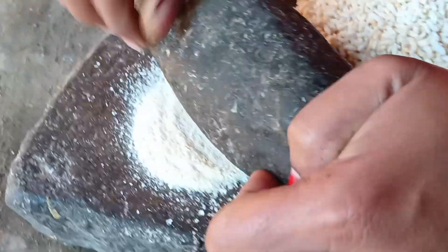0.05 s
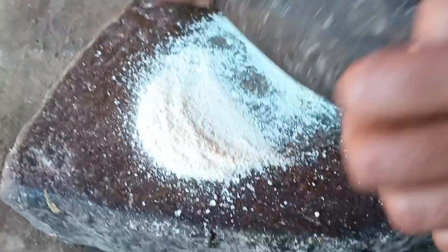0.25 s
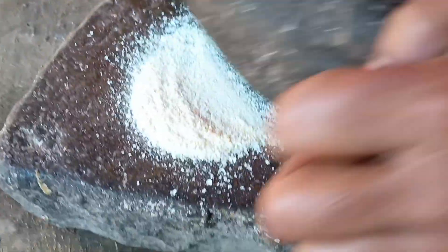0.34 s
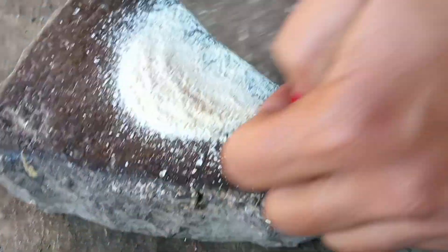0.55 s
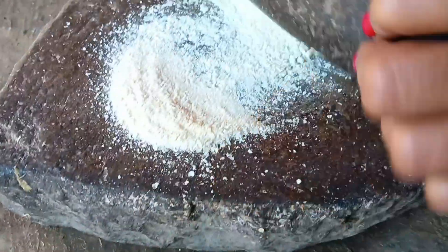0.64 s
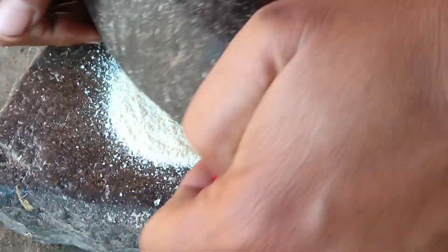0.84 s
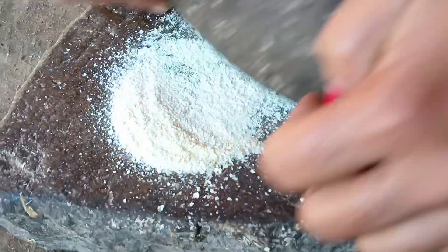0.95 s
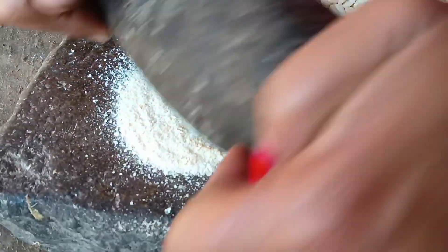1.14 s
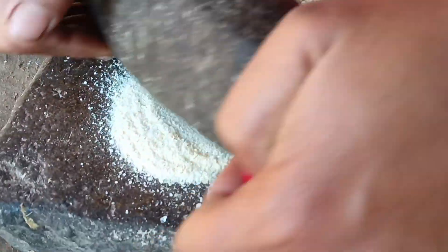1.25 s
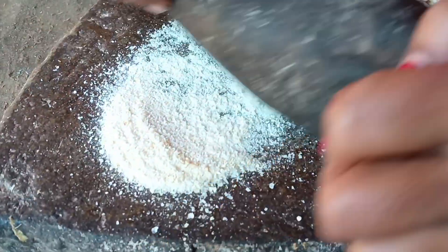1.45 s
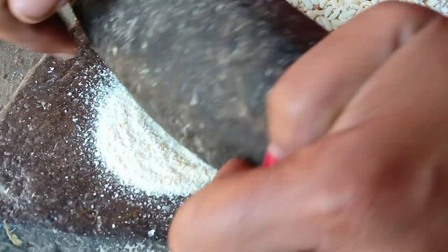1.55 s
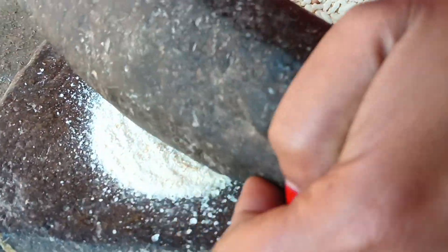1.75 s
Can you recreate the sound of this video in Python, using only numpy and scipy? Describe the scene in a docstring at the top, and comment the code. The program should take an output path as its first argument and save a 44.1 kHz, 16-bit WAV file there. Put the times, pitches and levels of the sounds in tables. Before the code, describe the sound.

A stone muller grinds puffed rice on a stone slab in quick back-and-forth strokes, rasping and rumbling with crisp gritty crunches; glassy bangle clinks punctuate the turns. Close microphone outdoors, mono, faint bird peeps behind.

```python
"""Outdoors, close by: a stone muller is worked back and forth over a stone slab. Each stroke rasps and rumbles:
random grit impacts through stone resonances. Forward strokes crush puffed rice, gritty cracks over noise; flour
hisses on the way back. Bright clinks, probably glass bangles as the hand turns, are noise cracks with ringing modes.
The eased muller hums and squeaks: narrow noise bands. Birds peep faintly, as gliding sines over quiet noise."""
import sys
import numpy as np
from scipy import signal
from scipy.fft import rfft, irfft, next_fast_len
from scipy.io import wavfile
from scipy.ndimage import map_coordinates

SR = 44100
rng = np.random.default_rng(int(sys.argv[2]) if len(sys.argv) > 2 else 0)


def wrap_up_sound(samples):
    """Save the sound to the file named by the first command line argument, as 16-bit audio."""
    columns = np.atleast_2d(samples).T
    # keep every value between -1 and 1, then stretch to whole-number steps
    tamed = np.clip(columns, -1, 1)
    steps = np.round(tamed * 32767).astype(np.int16)
    wavfile.write(sys.argv[1], SR, steps)


N = 79380


def amp(db):
    """Decibels to gain."""
    return 10 ** (np.asarray(db) / 20)


def unit(x):
    """Scale to rms 1."""
    return x / np.sqrt(np.mean(x ** 2) + 1e-20)


def along(points, hz):
    """Interpolate (f/Hz, value) points on a log-frequency axis."""
    f, v = np.transpose(points)
    return np.interp(np.log(hz + 1), np.log(f + 1), v)


def filtered(x, response):
    """Filter x by a response given as a function of f/Hz."""
    m = next_fast_len(len(x) + 8192)
    spectrum = rfft(x, m) * response(np.fft.rfftfreq(m, 1 / SR))
    return irfft(spectrum, m)[:len(x)]


def tilted(hz, tilt_db):
    """Gain of a tilt in dB per octave: 0 dB at 9 kHz, constant below 2.5 kHz."""
    return amp(tilt_db * np.log2(np.maximum(hz, 2500) / 9000))


def body(modes, f):
    """Sum of bandpass resonances (f/Hz, width/Hz, level/dB), alternating in sign."""
    total = 0
    for k, (centre, width, db) in enumerate(modes):
        resonance = 1j * f * width / (centre * centre - f * f + 1j * f * width)
        total = total + (-1) ** k * amp(db) * resonance
    return total


def grains(per_s, scatter_db):
    """Random tiny impacts of uneven size and either sign, rms 1."""
    size = amp(scatter_db * np.clip(rng.standard_normal(N), -2.5, 2.5))
    struck = rng.random(N) < per_s / SR
    return unit(struck * size * rng.choice([-1, 1], N))


def swell(peak, rise, fall):
    """Pressure of one stroke: builds to a peak and lets go."""
    drop_db, curvature = 26.5, 1.74  # drop at the end of rise or fall
    t = np.arange(N) / SR - peak
    return amp(-drop_db * np.abs(t / np.where(t < 0, rise, fall)) ** curvature)


def wobble(knots_per_s):
    """Smooth random curve through normal random knots."""
    return map_coordinates(rng.standard_normal(2000), [np.arange(N) * knots_per_s / SR])


def add(out, s, sound):
    """Mix a sound into out at time s."""
    part = out[round(s * SR):][:len(sound)]
    part += sound[:len(part)]


def air():
    """Quiet outdoor background: coloured noise with a slowly moving level."""
    # background level: t/s, level/dB
    level_points = [(0, -52.5), (.15, -51.5), (1.6, -48.5), (1.8, -50.5)]
    # background spectrum: f/Hz, gain/dB
    air_colour = [(25, -27), (90, 11), (250, 2), (700, -8), (2300, -5), (2750, -5.5), (3300, -7.5),
                  (5000, -8), (7000, -14.5), (11000, -17), (16000, -28)]
    level_db = np.interp(np.arange(N) / SR, *np.transpose(level_points))
    noise = filtered(rng.standard_normal(N), lambda f: amp(along(air_colour, f)))
    return amp(level_db) * unit(noise)


def birds():
    """Thin fluttering whistles that arch in pitch, smeared by a decaying noise tail for distance."""
    # peeps: t of top/s, top f/Hz, rise/s, fall/s, pitch drop one fall time from the top/Hz, level/dB
    peeps = [(.030, 5220, 0.031, .075, 2480, -52.5), (.51, 4850, 0.068, 0.073, 412, -56.5),
             (.895, 3560, 0.02, 0.11, 1200, -51), (1.148, 3430, 0.018, .07, 1300, -49),
             (1.235, 5220, 0.015, 0.024, 100, -57), (1.713, 5600, 0.036, 0.036, 688, -57),
             (1.75, 4400, .045, 0.026, 71, -60), (1.754, 5200, .012, .06, 700, -57.5)]
    flutter_db, flutter_knots_per_s = 2.5, 120
    echo_db, echo_t60_s = -3, 0.13
    out, t = np.zeros(N), np.arange(N) / SR
    for s, top_hz, rise, fall, drop_hz, db in peeps:
        hz = top_hz - drop_hz * np.minimum(((t - s) / fall) ** 2, 2)
        u = np.clip((t - s) / np.where(t < s, rise, fall), -1, 1)
        envelope = 1 - np.abs(u) ** 10
        out += amp(db) * np.sqrt(2) * envelope * np.sin(2 * np.pi * np.cumsum(hz) / SR)
    out *= amp(flutter_db * wobble(flutter_knots_per_s))
    tail = rng.standard_normal(SR // 2) * amp(-60 * t[:SR // 2] / echo_t60_s)
    echo = signal.fftconvolve(out, tail / np.linalg.norm(tail))[:N]
    return out + amp(echo_db) * echo


def contact(tilt_db, ring_db, count=2):
    """One touch of glass on glass: a crack with a slower tail, and modes of nearly equal bangles, drawn anew."""
    # bangle modes before detuning: f/Hz, level/dB, t60/s
    bangle_modes = [(2413, -14, 0.1), (3230, -5.5, .05), (6600, -26, 0.03), (6480, -24, .06),
                    (7950, -28, 0.072), (8840, -3, 0.078), (9100, -1.5, 0.065), (9500, -5.5, 0.1),
                    (9830, 0, 0.067), (11000, 1, .05), (12620, 1, 0.047), (12600, -3, 0.046),
                    (13750, -1, 0.11), (15900, -3, 0.078)]
    # crack spectrum before tilt: f/Hz, gain/dB
    crack_colour = [(300, -34), (1500, -13), (3200, -11.5), (4600, -13.5), (5900, -8.5), (6700, 5.5),
                    (7700, -0.5), (9200, 9), (10600, -16), (12500, -4), (15500, 0)]
    crack_t60_s, tail_t60_s, tail_db = .013, 0.085, -11
    base_ring_db = -12.5
    detune = .018  # scale of the random pitch spread, as a share of mode frequency
    t = np.arange(SR // 10) / SR
    noise = rng.standard_normal(len(t))
    crack = unit(filtered(noise, lambda f: amp(along(crack_colour, f)) * tilted(f, tilt_db)))
    crack *= amp(-60 * t / crack_t60_s) + amp(tail_db - 60 * t / tail_t60_s)

    hz, db, t60 = np.transpose(bangle_modes)[:, :, None]
    size, shift, phase = rng.uniform(-1.14, 1, (3, count, len(hz), 1))
    tones = size * np.sin(2 * np.pi * (hz * (1 + detune * shift) * t + phase))
    ring = amp(db - 60 * t / t60) * tilted(hz, tilt_db) * tones.sum(0)
    onset = 1 - np.exp(-t / .0001)
    return (crack + amp(base_ring_db + ring_db) * ring.sum(0)) * onset


def bangles(count=3):
    """Each clink is a quick rattle of a few weakening contacts."""
    # clinks: t/s, relative level/dB, rattle length/s, tilt/(dB/octave), relative ring level/dB
    clinks = [(0.0681, -23, 0.00038, 9.5, -7), (0.116, -31, 0.0026, -0.5, 5.5),
              (0.2356, -26, 0.00028, -7.5, -22), (0.262, -18, .004, 4, -18), (0.282, -22, 0.0047, 13, -8),
              (0.4, -44.5, .001, -8, 11), (0.4158, -22.5, .003, -1, 6), (0.4423, -28, .002, -4.5, 4),
              (.458, -17, .009, 2, 2), (0.6351, -6, .001, 3.5, -20), (0.7717, -23, .003, 5, -3),
              (0.7894, -27.5, .001, -1.5, 5), (0.7948, -19, .001, 8, -2), (.8015, -11.5, .008, 2, 3.5),
              (.991, -28, 0.00066, 8, -6), (1.0088, -9, 0.00049, -1, -2.5), (1.042, -14.5, .0008, 9.5, -12),
              (1.146, -41.5, .003, -10, 2), (1.166, -18.5, .006, 2.5, 3.5), (1.173, -21.5, .004, -1.5, 2),
              (1.207, -30, .001, 1, 8.5), (1.372, -28.5, .002, 3, 0), (1.3905, -20.5, 0.0018, 4.5, 1),
              (1.524, -22, .001, 5, -15), (1.531, -12, 0.0011, 3, -8), (1.5365, -23.5, .004, -3, -6),
              (1.5528, -30, .002, 1, 7.5), (1.644, -36, .001, -4, -14), (1.7438, -33.5, .003, 0.5, 0)]
    out = np.zeros(N)
    for s, db, rattle_s, tilt_db, ring_db in clinks:
        for k in range(count):
            gain = amp(db - 1.5 - 1.83 * k)
            add(out, s + rattle_s * k / count, gain * contact(tilt_db, ring_db))
    return out


def sliding():
    """The eased muller, bare stone on stone: resonant noise as a low hum, brief narrow bands as squeaks."""
    # hum resonances: f/Hz, width/Hz, level/dB
    slide_modes = [(246, 16.6, 1), (340, 45, -11.5), (393.5, 25, -3.5), (870, 38, -15)]
    # slides: t of peak/s, rise/s, fall/s, level/dB
    slides = [(1.38, 0.12, 0.19, -39), (1.58, 0.13, 0.21, -47.5)]
    # squeaks: t/s, half length/s, f/Hz, level/dB
    squeaks = [(0.157, 0.017, 2170, -36), (.525, 0.04, 2054, -36.5)]
    squeak_width_hz = 94

    def hum_response(f):
        return body(slide_modes, f) / np.hypot(1, f / 900) / np.hypot(1, 150 / (f + 1))

    hum = unit(filtered(rng.standard_normal(N), hum_response))
    out = hum * sum(amp(db) * swell(s, rise, fall) for s, rise, fall, db in slides)
    for s, half, hz, db in squeaks:
        squeak = filtered(rng.standard_normal(N), lambda f: 1 / (1 + ((f - hz) / squeak_width_hz) ** 2))
        out += amp(db) * swell(s, half, half) * unit(squeak)
    return out


def rice():
    """Small fractures over a hiss under each forward stroke; a different flour hiss on the way back."""
    # rice crushed: t of peak/s, rise/s, fall/s, level/dB, tilt/(dB/octave)
    crushes = [(0.291, .10, .10, -24, 1.5), (.665, 0.064, 0.11, -25.5, 2.5),
               (1.066, 0.1, 0.087, -29.5, 1.5), (1.428, 0.099, 0.12, -27.5, 2.5)]
    # flour rubbed on the way back: t of peak/s, rise/s, fall/s, level/dB, tilt/(dB/octave)
    rubs = [(.2, 0.12, 0.065, -46, 3.5), (.61, 0.18, 0.13, -43, 0), (.96, 0.12, 0.058, -41, 2),
            (1.349, 0.18, 0.02, -40.5, 0)]
    # crushed rice spectrum before tilt: f/Hz, gain/dB
    rice_colour = [(300, -32), (2000, -4.5), (2900, -8), (4000, -3.5), (5500, -9.5), (7200, -4.5),
                   (8600, 0.5), (10000, -10.5), (11500, -14), (13500, -8.5), (15700, -7)]
    # rubbed flour spectrum before tilt: f/Hz, gain/dB
    flour_colour = [(300, -19), (2400, 8.5), (3000, -2), (4300, 2.5), (5400, -9.5), (6400, 2.5), (7200, -6),
                    (8500, 5), (9400, -7), (11000, -16), (14000, -8), (15700, -10.5)]
    grains_per_s, scatter_db = 3000, 5
    powder_db, flour_db = -0.5, -4  # hiss relative to the cracks
    clump_db, clump_knots_per_s = 1, 230  # kernels give way in quick clumps
    out = np.zeros(N)
    for strokes, hiss_db, colour in (crushes, powder_db, rice_colour), (rubs, flour_db, flour_colour):
        for s, rise, fall, db, tilt_db in strokes:
            grit = grains(grains_per_s, scatter_db) + amp(hiss_db) * rng.standard_normal(N)
            grit *= amp(clump_db * wobble(clump_knots_per_s))
            crunch = filtered(grit, lambda f: amp(along(colour, f)) * tilted(f, tilt_db))
            out += amp(db) * swell(s, rise, fall) * unit(crunch)
    return out


def stone():
    """Grit catching between the stones shakes their resonances; dull bumps of the muller excite the slab."""
    # strokes: t of hardest pressure/s, rise/s, fall/s, rasp level/dB, rumble level/dB
    stone_strokes = [(0.133, 0.14, .08, -38, -41.5), (0.337, 0.18, 0.079, -29.5, -36.5),
                     (0.529, 0.04, 0.077, -34.5, -44), (0.717, .14, 0.065, -29.5, -37.5),
                     (0.923, 0.087, .13, -36, -42.5), (1.08, 0.072, 0.076, -27, -32.5),
                     (1.32, 0.096, 0.11, -32.5, -34), (1.443, 0.067, .11, -26.5, -31.5),
                     (.44, 0.038, 0.068, -49.5, -48.5)]
    # slab resonances: f/Hz, width/Hz, level/dB
    slab_modes = [(85, 62, -9), (137.8, 56, -0.5), (185.2, 61, -0.5), (234.6, 30.8, 0), (381.4, 13.3, -9),
                  (498, 42.5, -8)]
    # muller resonances: f/Hz, width/Hz, level/dB
    muller_modes = [(633, 73, -11), (868.6, 81, -2.5), (1146, 61, -4), (1321, 35, -2), (1404, 42.5, -1),
                    (1570, 94, 2), (1672, 53, 0.5), (1724, 83, -1), (1903, 39, -3.5), (2045, 150, -4)]
    # bumps on the slab: t/s, level/dB
    bumps = [(0.03, -41), (.083, -33), (0.268, -35.5), (0.388, -35), (.452, -47), (0.498, -37),
             (0.723, -29), (.962, -47), (1.088, -23), (1.677, -37.5)]
    grains_per_s, scatter_db = 4000, 2
    rasp_top_hz, rumble_low_hz, rumble_top_hz = 2540, 61.5, 720
    bump_t60_s, bump_attack_s = 0.049, 0.00071
    t = np.arange(N) / SR

    def rasp_response(f):
        return body(muller_modes, f) / np.hypot(1, (f / rasp_top_hz) ** 6)

    def rumble_response(f):
        low_cut = np.hypot(1, (rumble_low_hz / (f + 1)) ** 4)
        high_cut = np.hypot(1, (f / rumble_top_hz) ** 2)
        return body(slab_modes, f) / low_cut / high_cut

    rasp = unit(filtered(grains(grains_per_s, scatter_db), rasp_response))
    rumble = unit(filtered(grains(grains_per_s, scatter_db), rumble_response))
    rasp_gain = sum(amp(db) * swell(s, rise, fall) for s, rise, fall, db, _ in stone_strokes)
    rumble_gain = sum(amp(db) * swell(s, rise, fall) for s, rise, fall, _, db in stone_strokes)
    bump_gain = 0
    for s, db in bumps:
        decay = amp(db - 60 * np.abs(t - s) / bump_t60_s)
        bump_gain = bump_gain + decay * np.clip((t - s) / bump_attack_s, 0, 1)
    return rasp * rasp_gain + rumble * (rumble_gain + bump_gain)


def scene():
    """Mono sum of all sources."""
    return (stone() + sliding() + rice() + bangles() + birds() + air())[None]


def record(dry):
    """Cut the deepest bass and everything above the band limit."""
    low_hz, top_hz = 48, 15900

    def response(f):
        treble = np.clip((top_hz - f) / 200 + .5, 0, 1)
        return treble / np.hypot(1, (low_hz / (f + 1)) ** 3)

    return np.array([filtered(ch, response) for ch in dry])


dry = scene()
out = record(dry)
wrap_up_sound(out)
```